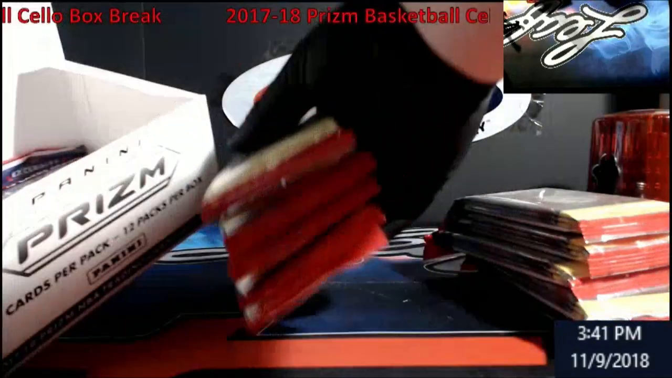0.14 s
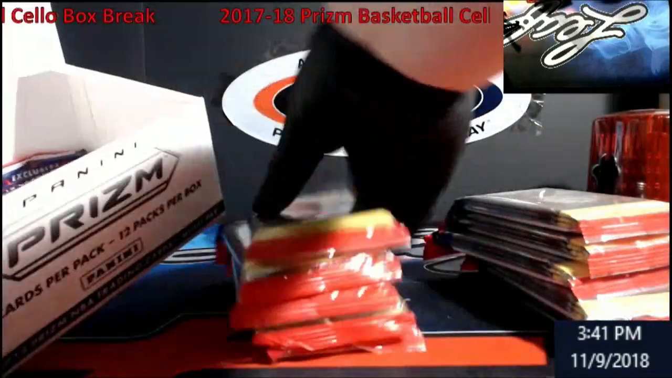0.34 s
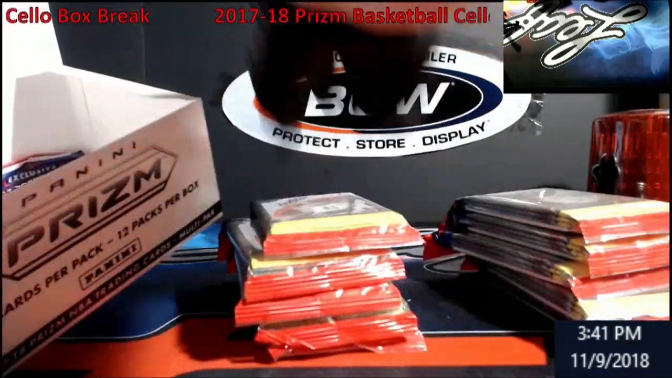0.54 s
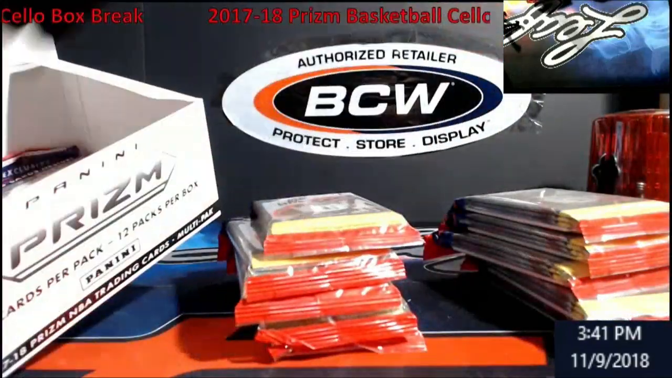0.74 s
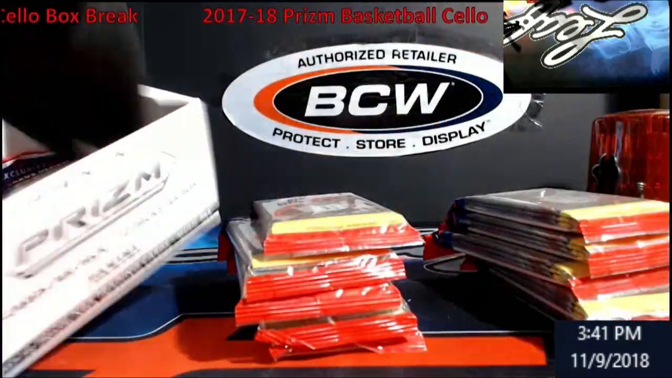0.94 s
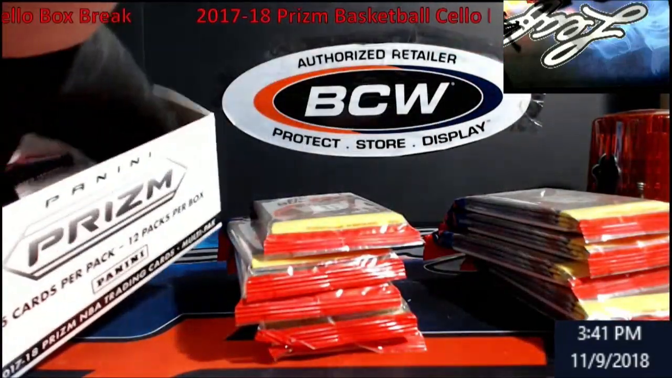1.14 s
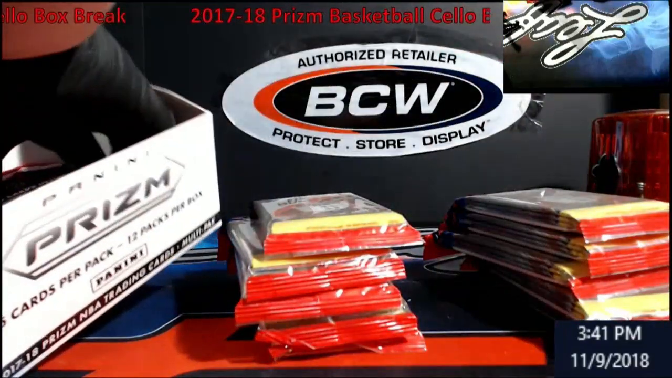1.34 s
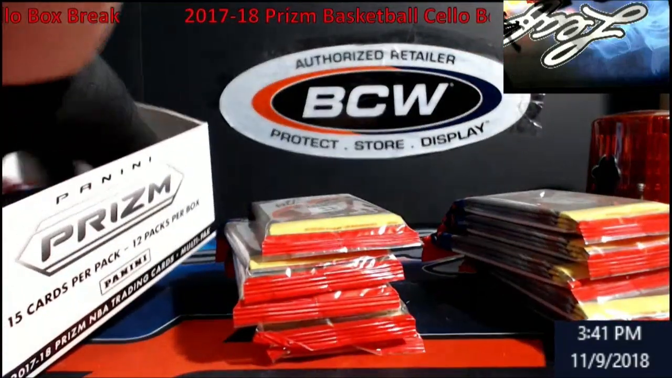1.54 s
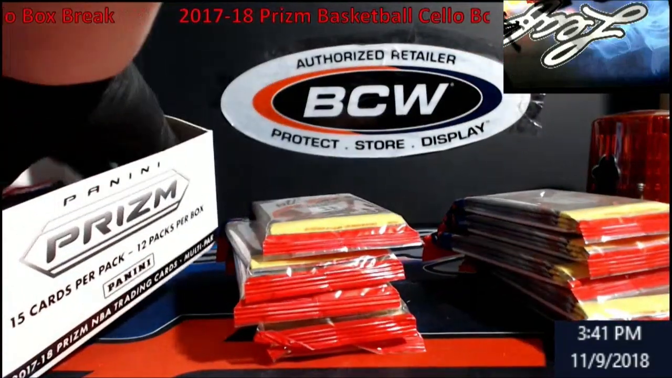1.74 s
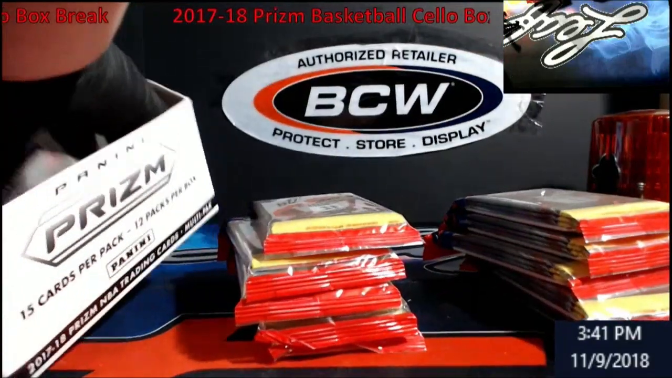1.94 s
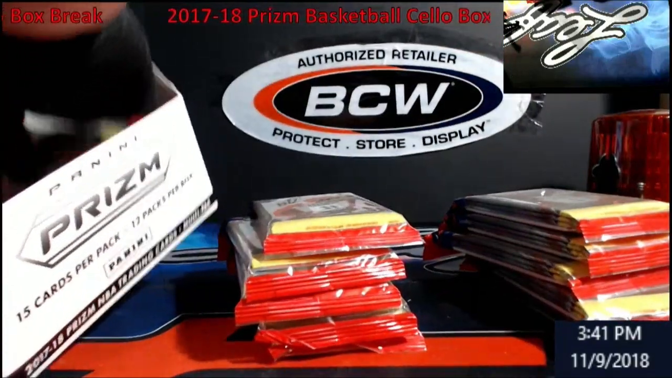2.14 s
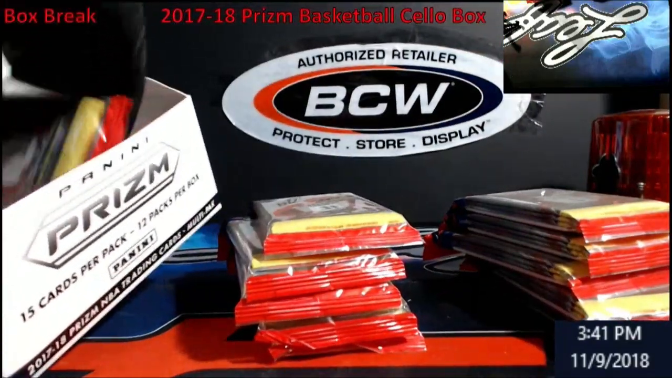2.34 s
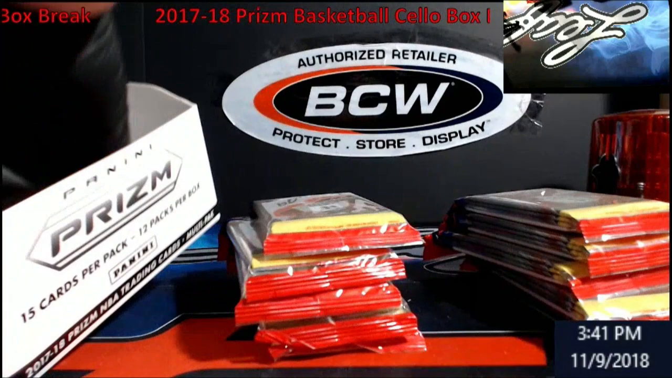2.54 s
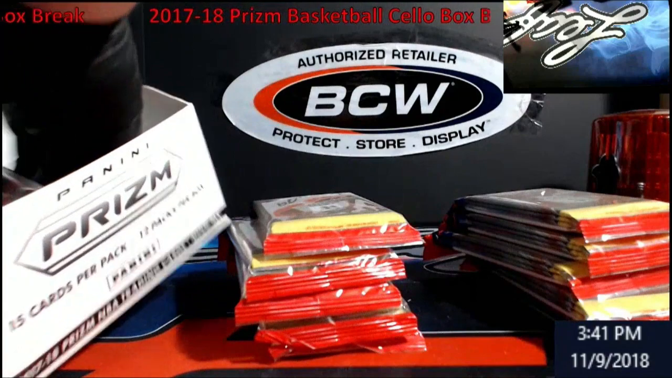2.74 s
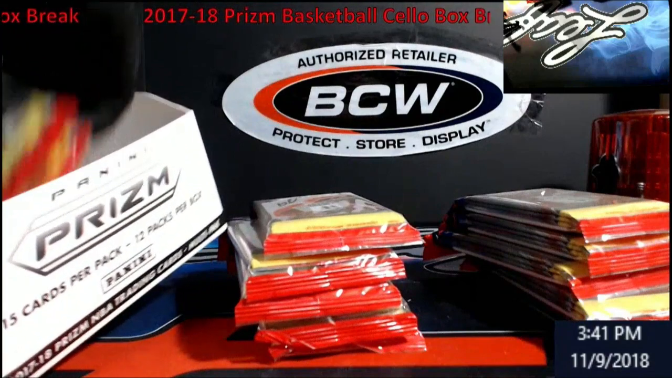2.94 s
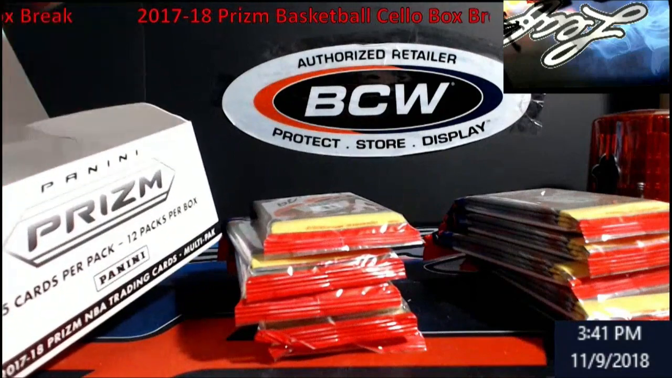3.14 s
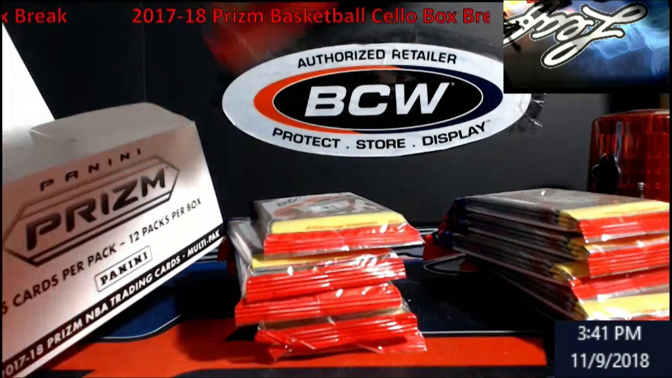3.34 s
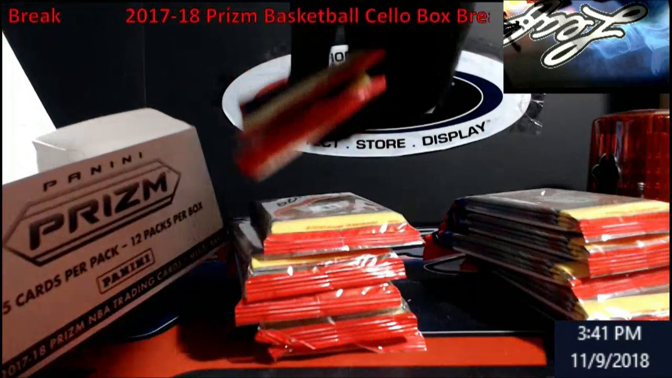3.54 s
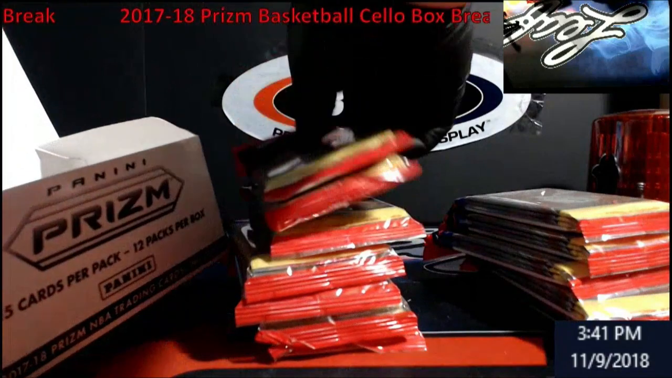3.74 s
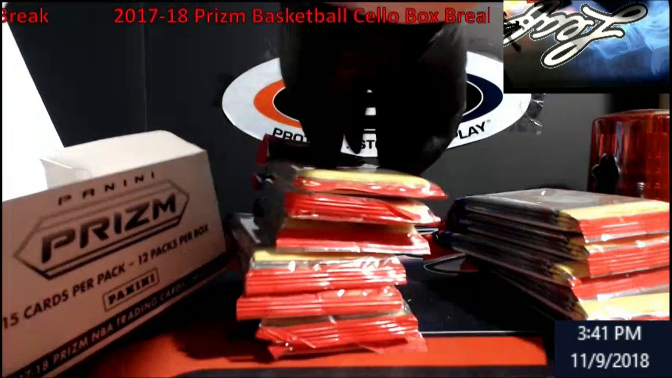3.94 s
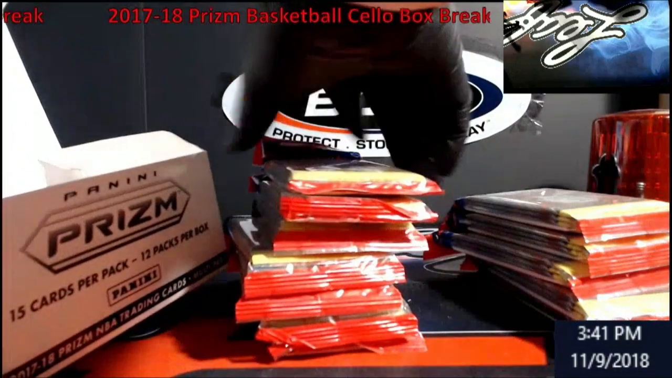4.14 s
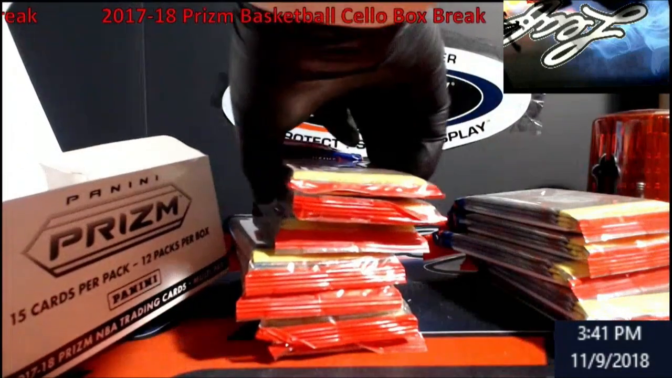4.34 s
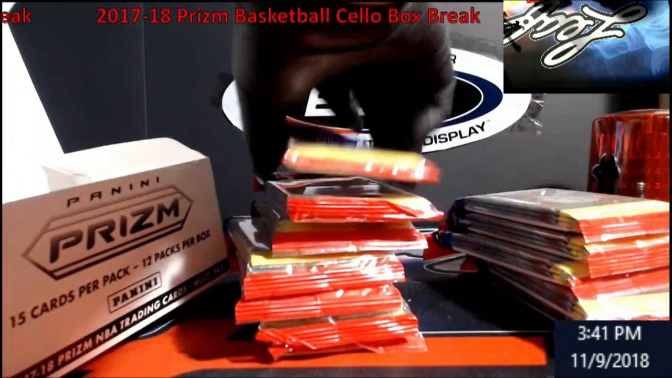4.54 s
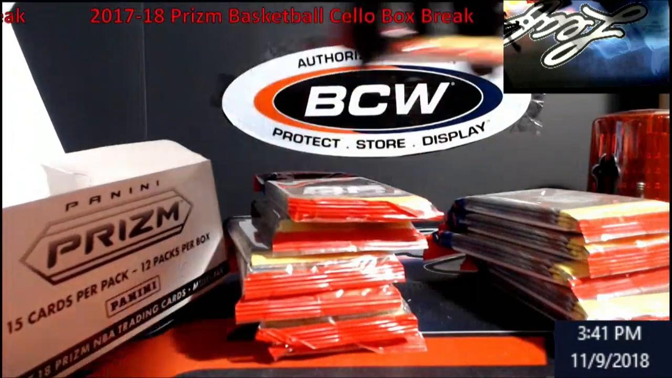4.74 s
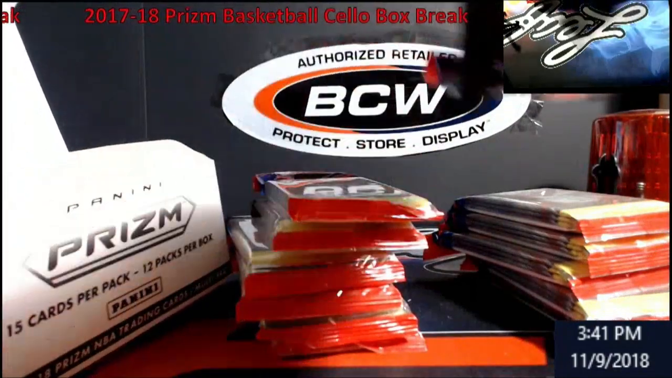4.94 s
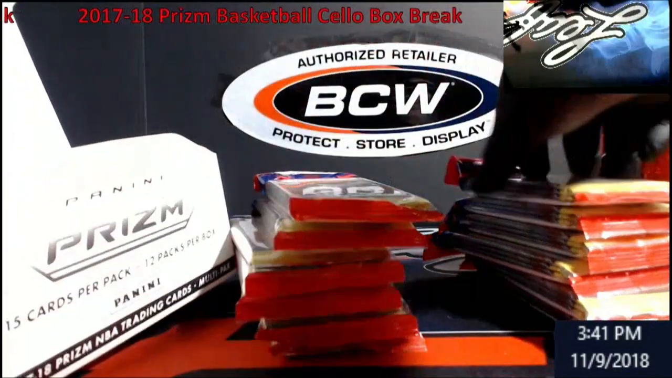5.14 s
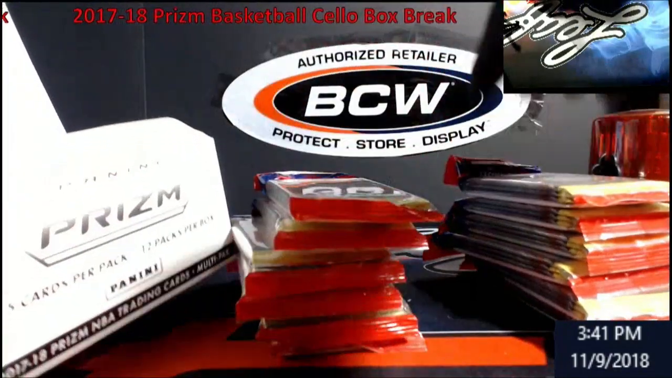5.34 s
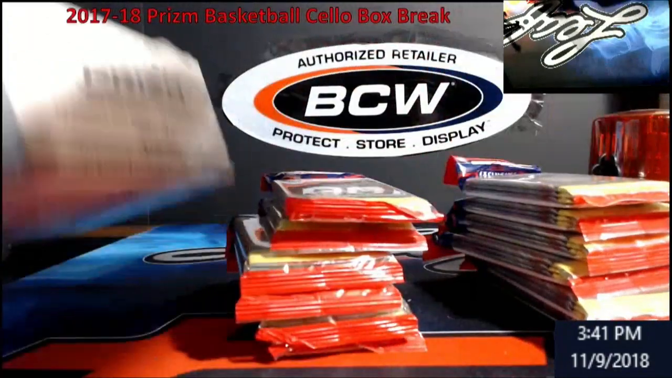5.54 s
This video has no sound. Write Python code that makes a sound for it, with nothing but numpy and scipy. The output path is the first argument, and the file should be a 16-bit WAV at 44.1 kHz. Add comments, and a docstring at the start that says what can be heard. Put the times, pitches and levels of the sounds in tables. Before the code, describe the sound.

A sharp slap and clap of wrapped packs comes first, then near silence. Bright film crinkling and cardboard rubbing build in bursts, with one heavy boxy thump and ringing snaps, peaking as packs are dragged out. A quiet gap, delicate fingertip rustling on wrappers, then a dull knock as a pack is laid aside and the box shifts. Close, dry, short room tail.

```python
"""Card packs in a cardboard box

Film-wrapped card packs are gathered in a box, lifted out and stacked on a table, close to a desk microphone.
Creases in the film buckle as swarms of random clicks and a few loud, ringing snaps.
Pack edges stick and slip along the cardboard, squeak, and knock it into damped resonance.
A small room adds a decaying tail, over a faint steady hiss and hum of air made of filtered noise."""
import sys
import numpy as np
from scipy import signal
from scipy.fft import rfft, irfft
from scipy.io import wavfile
from scipy.ndimage import uniform_filter1d

SR = 44100
rng = np.random.default_rng(int(sys.argv[2]) if len(sys.argv) > 2 else 0)


def unload_audio(sound):
    """Save the sound as a 16-bit wav file, at the path given as the first command line argument."""
    columns = np.transpose(np.atleast_2d(sound))
    # keep every value between -1 and 1, then stretch to whole-number steps
    steps = np.round(np.clip(columns, -1, 1) * 32767)
    wavfile.write(sys.argv[1], SR, steps.astype(np.int16))


N = 250605
TIME = np.arange(N) / SR  # s

# Resonances of the box and the packs in it. Each row: frequency in Hz, width in Hz, relative strength in dB.
BOX_MODES = [(178, 4.7, -0.5), (229.6, 40, -7), (418, 26, 4.5), (603.6, 65, 5.5), (764, 26, -7.5),
             (867, 13, 5.5), (1001.4, 30, -0.5), (1540, 20, -1.5), (1970, 79, -5.5), (2190, 96, -4),
             (2570, 180, -1)]
# Dull colour of a heavy body, struck or bent. Each row: frequency in Hz, relative level in dB.
THUD_COLOUR = [(30, -37.5), (75, -17), (110, -5.5), (170, 6), (280, 6), (420, 0), (900, -44), (6000, -84)]


def crinkle(film_db):
    """Buckling: film creases of three sizes flip, more of them under a firmer grip; a light touch glides, high and fine."""
    # Colours of creased film and of a gliding fingertip. Each row: frequency in Hz, relative level in dB.
    film_colour = [(300, -53), (1500, -27.5), (3500, -8.5), (4700, -9.5), (5600, 3), (6300, 3), (7600, 1.5),
                   (8600, -6), (10000, -13.5), (12000, -29), (16000, -45.5)]
    glide_colour = [(500, -45), (3000, -26), (5000, -14.5), (6500, 0.5), (7400, 6.5), (8200, -2.5),
                    (9100, -6), (10000, -21), (12000, -29), (16000, -45)]
    clicks_per_s = 1500 * undb(0.37 * (film_db + 36.5))
    creases = np.zeros(N)
    for hz in (5700, 6700, 7700):
        clicks = swarm(clicks_per_s, spread_db=4.5, even_s=0.15)
        creases += ring(clicks, response(film_colour, [(hz, 1400, 0)]))
    glide = ring(swarm(1500, spread_db=4.5, even_s=0.15), response(glide_colour))
    light = np.clip((-41.5 - film_db) / 12, 0, 0.9)  # share of the power that glides
    return (np.sqrt((1 - light) / 3) * creases + np.sqrt(light) * glide) * undb(film_db)


def scraping(scrape_db, edge_db):
    """Stick-slip friction: crimped pack edges on cardboard drive a hollow body and a bright edge sound."""
    # Colours of the hollow body and of the bright edge. Each row: frequency in Hz, relative level in dB.
    body_colour = [(50, -53), (150, -31), (300, -8.5), (450, 0), (750, 6.5), (1200, 8), (1700, -3),
                   (3000, -23), (12000, -66)]
    edge_colour = [(150, -45), (700, -14), (1500, 5), (2200, 1.5), (3000, -5), (3700, -0.5), (4600, -6.5),
                   (6500, -12), (14000, -56.5)]
    slips_per_s = 3000 * undb(0.24 * (scrape_db + 34.5))
    slips = swarm(slips_per_s, spread_db=3.5, even_s=0.06)
    body = ring(slips * undb(scrape_db), response(body_colour, BOX_MODES))
    edges = ring(slips * undb(edge_db), response(edge_colour, BOX_MODES))
    return body, edges


def hollows(x, echo_db, reach_s, size=4096, count=14):
    """Multipath interference: gaps between packs and box walls echo within milliseconds and colour the sound."""
    out = np.zeros(N + 4 * size)
    padded = np.pad(x, (size, 2 * size))
    fade = signal.windows.hann(size, sym=False)
    # overlapping blocks fade into each other, each with newly drawn echoes
    for start in range(0, N + size, size // 2):
        lags = 8 + rng.exponential(size=count) * reach_s * SR
        lags = np.minimum(lags, size - 1).astype(int)
        gains = rng.standard_normal(count)
        gains *= undb(echo_db) / np.linalg.norm(gains)
        paths = np.bincount(lags, gains, size)
        paths[0] = 1  # direct sound
        paths /= np.linalg.norm(paths)
        block = padded[start:start + size] * fade
        out[start:start + 2 * size - 1] += signal.fftconvolve(block, paths)
    return out[size:size + N]


def snaps():
    """Snap-through instability: a taut crease flips over and rings for a few milliseconds at its own pitch."""
    # Single creases. Each row: start in seconds, level over 10 ms in dB, pitch in Hz.
    creases = [(0.0778, -25, 5200), (0.194, -36.5, 6240), (0.238, -25, 6470), (0.243, -29, 5600),
               (0.2522, -30, 4920), (0.8938, -37.5, 5900), (1.0414, -34, 6800), (1.0945, -35, 3900),
               (1.124, -26.5, 5200), (1.383, -27.5, 2740), (1.4133, -39.5, 6500), (1.8236, -30.5, 4660),
               (1.9392, -45, 2840), (1.9767, -30, 5650), (2.0598, -27.5, 5200), (2.363, -31.5, 5810),
               (2.674, -38, 4130), (3.5622, -45, 5430), (3.6383, -43.5, 5490), (3.673, -50, 7000),
               (3.705, -30.5, 3076), (3.772, -29.5, 6350), (4.485, -53, 6800), (5.0079, -25.5, 4500),
               (5.3466, -39.5, 6000)]
    # Colour of a snap. Each row: frequency in Hz, relative level in dB.
    snap_colour = [(60, -36.5), (400, -26), (1500, 0.5), (3500, 2), (4600, -7.5), (6000, 3.5), (7800, 3),
                   (10000, -11.5), (12500, -35.5), (16000, -36.5)]
    out = np.zeros(N)
    for start, db, hz in creases:
        flip = ring(contact(decay_s=0.0018, grit=9.0), response(snap_colour, [(hz, 0.55 * hz, 6)]))
        # a small facet radiates no low notes
        small = signal.butter(2, min(0.42 * hz, SR / 4), "high", fs=SR, output="sos")
        add(out, start, signal.sosfilt(small, flip), db)
    return out


def knocks():
    """Impact: wrapper slaps, stiff cards clap, packs thud, then settle; each blow excites two damped modes."""
    # Packs hitting box, table or stack. Each row: start in seconds, thud level in dB, thud pitch in Hz,
    # cardboard clap level in dB, clap pitch in Hz, wrapper slap level in dB; all levels over 10 ms.
    blows = [(0.136, -37.5, 114, -60, 413, -70), (0.2055, -73, 200, -31, 770, -27.5),
             (0.2547, -25, 111, -19, 856, -12.5), (0.264, -32, 149, -39, 700, -40),
             (0.834, -31, 261, -38.5, 435, -52), (1.127, -37, 292, -46, 1000, -35.5),
             (1.144, -37.5, 173, -37, 604, -39), (1.27, -41.5, 282, -28, 723, -43),
             (1.29, -44.5, 246, -25.5, 608, -37.5), (1.557, -36, 333, -25, 720, -41),
             (1.762, -17.5, 197, -19.5, 1084, -20.5), (1.766, -20, 290, -14.5, 433, -51),
             (1.892, -28, 312, -30, 465, -31), (1.921, -33, 190, -34, 450, -53),
             (2.579, -40.5, 147, -28, 797, -33), (5.0093, -39, 114, -35, 1260, -31.5),
             (5.04, -25, 184, -21, 422, -29), (5.305, -47, 206, -42, 393, -42.5),
             (5.591, -47.5, 171, -58.5, 903, -80)]
    # Colours of clapping card and slapping film. Each row: frequency in Hz, relative level in dB.
    clap_colour = [(40, -50), (150, -28), (400, -7), (800, 2), (1300, -2), (2000, -6), (3500, -27),
                   (14000, -65)]
    slap_colour = [(100, -54.5), (900, -21.5), (2000, 0), (3700, 6.5), (4600, -2.5), (6000, 8), (7600, 1.5),
                   (10000, -10), (12500, -27), (16000, -31.5)]
    out = np.zeros(N)
    thud, clap, slap = response(THUD_COLOUR), response(clap_colour, BOX_MODES), response(slap_colour)
    for start, thud_db, thud_hz, clap_db, clap_hz, slap_db in blows:
        low, mid = mode(thud_hz, decay_s=0.012), mode(clap_hz, decay_s=0.008)
        # the loose packs settle 19.5 ms later with a second, weaker and duller blow
        for at, body_db, wrapper_db in (start, 0, 0), (start + 0.0195, -11.5, -18.5):
            thud_sound = low + 0.38 * ring(contact(decay_s=0.013, grit=2.5), thud)
            clap_sound = 0.5 * mid + 0.5 * ring(contact(decay_s=0.01, grit=1.5), clap)
            slap_sound = ring(contact(decay_s=0.0046, grit=6.4), slap)
            add(out, at, thud_sound, thud_db + body_db)
            add(out, at, clap_sound, clap_db + body_db)
            add(out, at, slap_sound, slap_db + wrapper_db)
    return out


def squeaks():
    """Friction-driven resonance: a catching edge feeds one narrow tone, which swells, wavers and dies away."""
    # Edges catching on film or card. Each row: start in seconds, level over 10 ms in dB, pitch in Hz,
    # time to the peak of the swell in seconds.
    catches = [(0.003, -33, 828, 0.001), (0.012, -43.5, 754, 0.014), (0.078, -46, 1600, 0.006),
               (0.084, -42.5, 6540, 0.01), (0.122, -45.5, 752, 0.01), (0.129, -50, 1970, 0.013),
               (2.43, -36.5, 768, 0.015), (4.204, -59.5, 1557, 0.0077), (4.254, -49, 1562, 0.0093),
               (4.532, -61.5, 1196, 0.008), (5.43, -51.5, 3250, 0.015), (5.433, -51, 810, 0.015)]
    out = np.zeros(N)
    t = TIME[:SR // 4]
    for start, db, hz, swell_s in catches:
        waver = unit(uniform_filter1d(rng.standard_normal(len(t)), 90))
        phase = 2 * np.pi * np.cumsum(hz * (1 + 0.043 * waver)) / SR
        swell = t * np.exp(-t / swell_s)
        add(out, start, swell * np.sin(phase), db)
    return out


def flexing(flex_db):
    """Bending under load: the box walls give under the hand in small, dull jerks."""
    jerks = swarm(500, spread_db=5.5, even_s=0.067)
    return ring(jerks * undb(flex_db - 8.5), response(THUD_COLOUR, BOX_MODES))


def room(x, wet_db, t60_s, gap_s, size=16384):
    """Reverberation: close walls return a short, dense, exponentially decaying tail that lacks the top treble."""
    t = np.arange(size) / SR
    onset = np.clip(t / gap_s - 1, 0, 1)  # silent for one gap, full after two
    tail = rng.standard_normal(size) * undb(-60 * t / t60_s) * onset
    walls = response([(60, 7), (200, 3.5), (1500, -6.0), (6500, 2.5), (9000, -5.5), (14000, -4.5)])
    return x + undb(wet_db) * ring(ring(x, tail / np.linalg.norm(tail)), walls)


def air():
    """Filtered noise: a broad colour gives steady hiss, narrow resonances a low, wavering hum."""
    # Colour of the room hiss. Each row: frequency in Hz, relative level in dB.
    hiss_colour = [(15, -67), (25, -34.5), (74, -29), (96, -21), (155, -2.5), (180, -13), (244, -12),
                   (405, -30), (508, -14.5), (622, -37), (743, -18), (957, -29), (1760, -26), (2500, -31.5),
                   (10600, -41.5), (13800, -74.5), (22000, -120)]
    hum_colour = [(40, -47), (95, -24), (153, -12), (215, -25.0), (400, -62.0)]
    hum_modes = [(164, 8, 16), (105, 8, 16), (207, 15, 38)]
    hiss = ring(rng.standard_normal(N), response(hiss_colour))
    hum = ring(rng.standard_normal(N), response(hum_colour, hum_modes))
    return unit(hiss) * undb(-67.5) + unit(hum) * undb(-82)


def pressure(strokes, rest_db):
    """Power summation: level in dB of strokes (start, length, swell, level) that rise, hold with a swell, and fall."""
    rise_db_per_s, fall_db_per_s = 1298, 951
    power = undb(2 * rest_db)  # doubled dB give power instead of amplitude
    for start, length, swell_db, db in strokes:
        early = np.maximum(start - TIME, 0)
        late = np.maximum(TIME - start - length, 0)
        progress = np.clip((TIME - start) / length, 0, 1)
        held_db = db + swell_db * (progress - 0.5)
        power = power + undb(2 * (held_db - rise_db_per_s * early - fall_db_per_s * late))
    return 10 * np.log10(power)


def swarm(per_s, spread_db, even_s):
    """Random point process: slips, many small and a few large, with power evened out over even_s."""
    sizes = undb(spread_db * np.minimum(rng.exponential(size=N), 5)) * rng.choice([-1, 1], N)
    slips = sizes * (rng.random(N) < per_s / SR)
    power = uniform_filter1d(slips ** 2, int(even_s * SR) + 1)
    return slips / np.sqrt(np.maximum(power, np.mean(power) / 20))


def contact(decay_s, grit, size=4096):
    """Contact force: one push with a quickly dying chatter of the surfaces."""
    chatter = rng.standard_normal(size) * np.exp(-np.arange(size) / SR / decay_s)
    push = grit * chatter / np.linalg.norm(chatter)
    push[0] = 1
    return push


def mode(hz, decay_s, size=4096):
    """Damped oscillation: a softly struck resonance of unit energy that builds up over its first cycle."""
    t = TIME[:size]
    wave = np.sin(2 * np.pi * hz * t) * np.exp(-t / decay_s) * np.tanh(2 * hz * t)
    return wave / np.linalg.norm(wave)


def response(points, modes=(), size=4096):
    """Minimum phase: causal impulse response of unit energy, a broad colour with resonances standing on it."""
    f = np.maximum(np.fft.rfftfreq(size, 1 / SR), 1)
    hz, db = np.transpose(points)
    gain = undb(np.interp(np.log(f), np.log(hz), db))
    peaks = sum(undb(2 * strength) * 2 / (1 + (2 * (f - centre) / width) ** 2)
                for centre, width, strength in modes)
    gain = gain * np.sqrt(1 + peaks)
    # folding the cepstrum onto positive times makes the response causal
    cepstrum = irfft(np.log(gain))
    cepstrum[1:size // 2] *= 2
    cepstrum[size // 2 + 1:] = 0
    h = irfft(np.exp(rfft(cepstrum)))
    return h / np.linalg.norm(h)


def ring(x, h):
    """Convolution: a sound excites a body with impulse response h."""
    return signal.fftconvolve(x, h)[:len(x)]


def add(track, s, sound, db):
    """Superposition: place a short sound at s seconds with the energy of 10 ms at level db."""
    start = max(int(s * SR), 0)
    gain = undb(db) * np.sqrt(SR / 10 ** 2 / np.sum(sound ** 2))
    part = sound[:N - start] * gain
    track[start:start + len(part)] += part


def undb(db):
    """Logarithmic level: decibels to amplitude gain."""
    return 10 ** (np.asarray(db) / 20)


def unit(x):
    """Normalisation: scale to rms 1."""
    return x / np.sqrt(np.mean(x ** 2))


def scene():
    """Shielding: hand and box screen the rustle, so it stays drier in the room than the blows."""
    # Packs rubbing on the box or each other: a first handful is set down, the hand digs into the box, gathers
    # the packs and drags them out, a second handful is stacked, a pack is laid aside and the box shifted.
    # Each row: start in seconds, length in seconds, swell over the stroke in dB, then levels before the
    # final mix in dB of film, hollow scrape and bright edge.
    rubs = [ (0.0, 0.07, -7, -64.5, -56.5, -62), (0.186, 0.081, 19, -39.5, -45, -41),
            (0.26, .04, -6, -40, -40.5, -27.5), (0.84, 0.022, 5, -33.5, -36, -34.5),
            (0.891, 0.017, 7, -29, -32, -35.5), (0.923, 0.13, -11, -42.5, -42, -42.5),
            (1.038, 0.11, 5.5, -36.5, -34, -35), (1.177, 0.03, -4.5, -48.5, -52, -45),
            (1.273, 0.024, 1.5, -42.5, -29.5, -38), (1.385, .04, -4, -47.5, -42, -45.5),
            (1.481, 0.053, 7.5, -69, -64.5, -68), (1.555, .05, -5.5, -72, -43.5, -58),
            (1.629, 0.038, 0.5, -33, -39, -39), (1.683, 0.061, 18, -37, -40.5, -36),
            (1.784, 0.046, 1, -41, -32.5, -37), (1.837, 0.12, -2.5, -28.5, -33.5, -28),
            (1.978, 0.049, -10, -28.5, -37.5, -34), (2.029, 0.083, -3, -34.5, -38.5, -32),
            (2.12, 0.087, -3.5, -31.5, -30, -30.5), (2.239, 0.066, -1, -54.5, -52, -66),
            (2.298, 0.026, -2, -32, -35.5, -32), (2.363, 0.024, -3, -37, -35, -35.5),
            (2.4, 0.073, 1.5, -42.5, -39.5, -59), (2.532, 0.048, 9.5, -30.5, -44, -34.5),
            (2.594, 0.032, 3.5, -19, -29.5, -21), (2.642, 0.091, -15, -30.5, -36.5, -29),
            (2.733, 0.083, 6, -35, -47, -39), (2.797, 0.091, -1.5, -29.5, -38, -34.5),
            (3.571, 0.02, -5.5, -48, -55.5, -49), (3.599, 0.038, 1.5, -41.5, -55.5, -44),
            (3.708, 0.083, -4, -52, -62.5, -49), (3.778, 0.024, -7, -45, -62, -48.5),
            (4.298, 0.032, -2, -65, -62, -68.5), (4.542, .01, 1, -63, -67, -62.5),
            (4.755, .01, -2, -61, -66, -70.5), (5.041, 0.072, -15.5, -45, -38, -44.5),
            (5.3, 0.021, -1.5, -41, -42.5, -41.5), (5.334, 0.057, -10, -47.5, -55.5, -56.5),
            (5.432, 0.023, 6, -49.5, -51.5, -56), (5.594, .032, -3.5, -69.5, -50.5, -63.5)]
    # Fingertips gliding over a wrapper. Each row: start in seconds, length in seconds, swell in dB,
    # film level before the final mix in dB.
    touches = [(0.09, 0.15, -17, -56), (3.497, 0.02, -4.5, -54.5), (3.85, 0.0064, -2.5, -48),
               (3.892, 0.18, -0.5, -51), (4.06, 0.067, -3.5, -54.5), (4.208, 0.11, -5, -53.5),
               (4.415, 0.013, -7, -59.5), (4.492, 0.053, -0.5, -54.5), (4.69, 0.076, 2.5, -72.5),
               (5.49, 0.053, 8.5, -60.5), (5.65, 0.027, 3.5, -64)]
    # Box walls or stack giving under the hand. Each row: start in seconds, length in seconds, swell in dB,
    # relative level in dB.
    flexes = [(0.125, 0.029, -4, -43), (0.62, .12, -6.5, -63), (0.838, .015, -9, -32.5),
              (0.88, 0.15, -3, -48), (1.055, 0.11, -15, -37.5), (1.625, .008, 1.5, -37),
              (1.79, 0.13, -2, -28.5), (2.06, .03, -3, -55), (2.135, 0.02, -2, -47.5),
              (2.44, .025, -0.5, -48.5), (2.58, 0.022, -1, -35.5), (2.66, 0.27, 2, -58),
              (3.565, 0.0098, -1, -50.5), (3.895, .035, -0.5, -52.5), (4.24, 0.017, -4.5, -51.5),
              (4.35, 0.011, -3, -55.5), (5.05, 0.054, -12.5, -29), (5.305, 0.064, -12, -39),
              (5.6, 0.029, -11.5, -45.5)]
    film_strokes = [(*stroke, film) for *stroke, film, _, _ in rubs] + list(touches)
    scrape_strokes = [(*stroke, scrape) for *stroke, _, scrape, _ in rubs]
    edge_strokes = [(*stroke, edge) for *stroke, _, _, edge in rubs]
    # the packs stir faintly between strokes
    film_db = pressure(film_strokes, rest_db=-83.5)
    scrape_db = pressure(scrape_strokes, rest_db=-75)
    edge_db = pressure(edge_strokes, rest_db=-77.5)
    flex_db = pressure(flexes, rest_db=-71.5)

    body, edges = scraping(scrape_db, edge_db)
    rustle = hollows(crinkle(film_db) + edges, echo_db=4, reach_s=0.002)
    rustle += hollows(body, echo_db=-3, reach_s=0.003)
    blows = flexing(flex_db) + snaps() + knocks() + squeaks()
    rustle = room(rustle, wet_db=-18, t60_s=0.15, gap_s=0.004)
    blows = room(blows, wet_db=-13, t60_s=0.17, gap_s=0.004)
    return (undb(-2.0) * rustle + blows + air())[None]


def record(dry):
    """Band limiting and overload: the microphone rolls off deep bass, clips at full scale and cuts the top."""
    bass_cut = signal.butter(2, 70, "high", fs=SR, output="sos")
    top_cut = signal.ellip(8, 0.2, 70, 15800, fs=SR, output="sos")
    lean = signal.sosfilt(bass_cut, dry)
    return signal.sosfilt(top_cut, np.clip(lean, -1, 1))


dry = scene()
out = record(dry)
unload_audio(out)
```